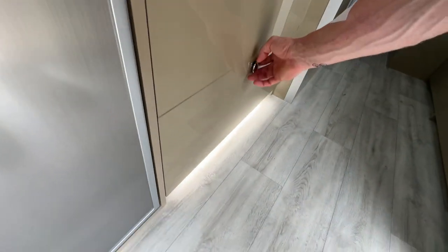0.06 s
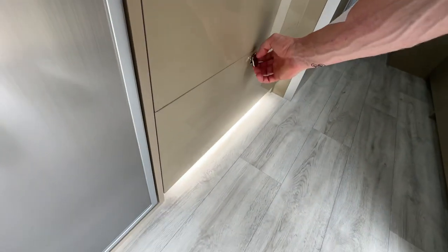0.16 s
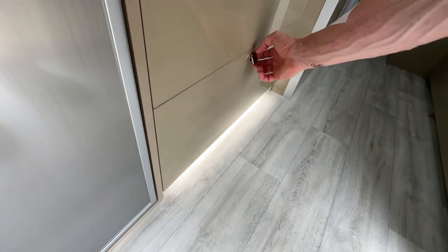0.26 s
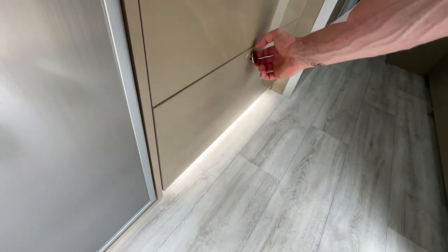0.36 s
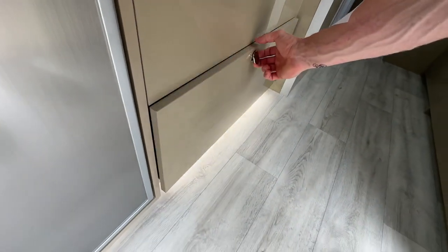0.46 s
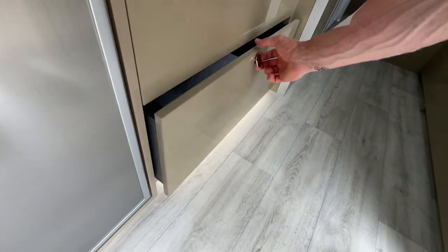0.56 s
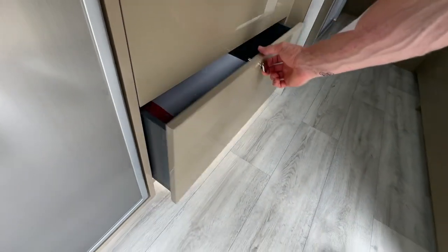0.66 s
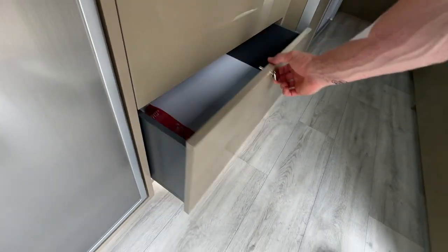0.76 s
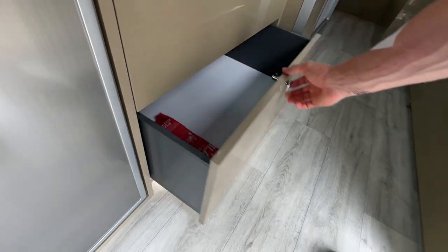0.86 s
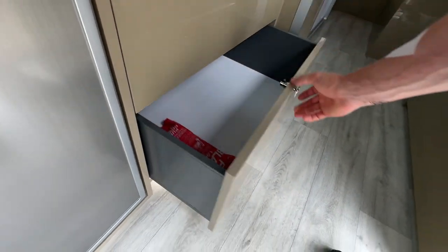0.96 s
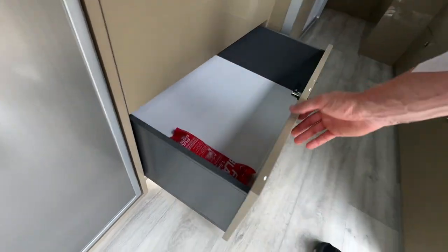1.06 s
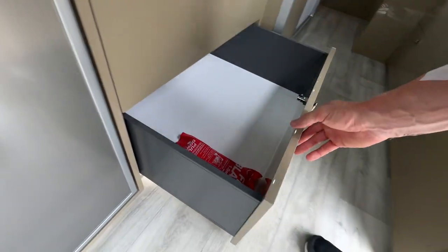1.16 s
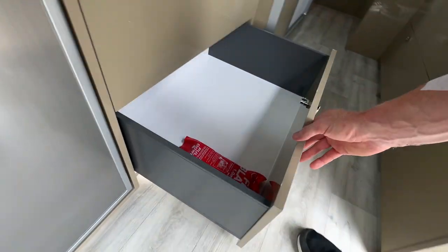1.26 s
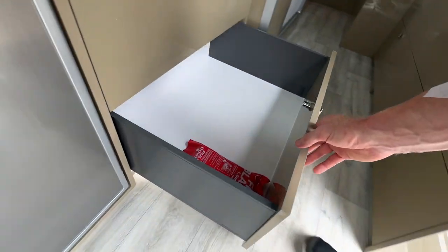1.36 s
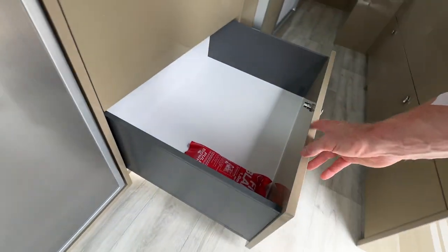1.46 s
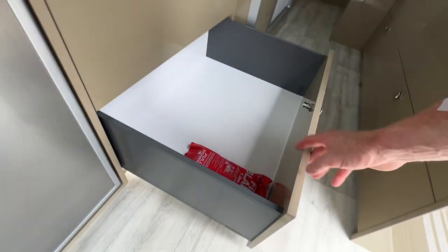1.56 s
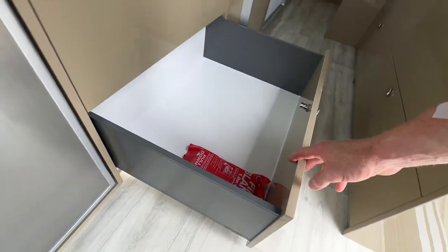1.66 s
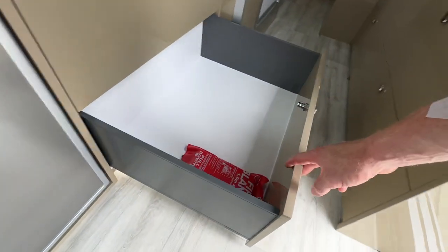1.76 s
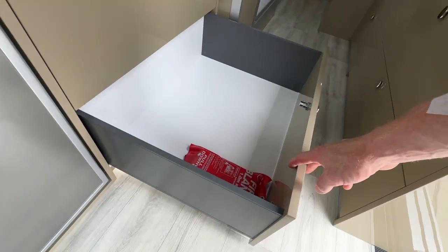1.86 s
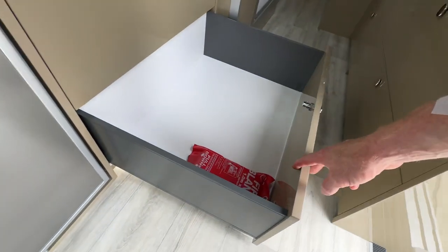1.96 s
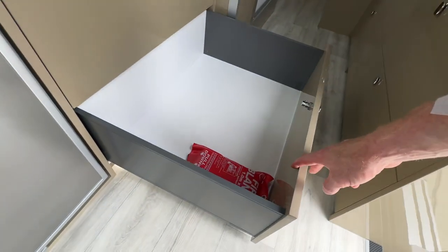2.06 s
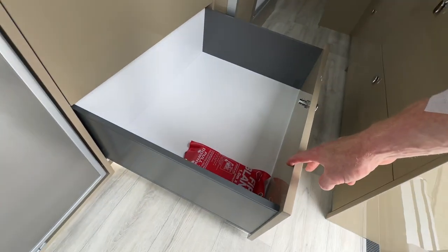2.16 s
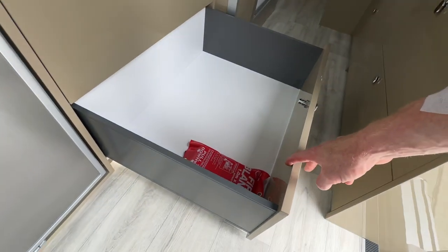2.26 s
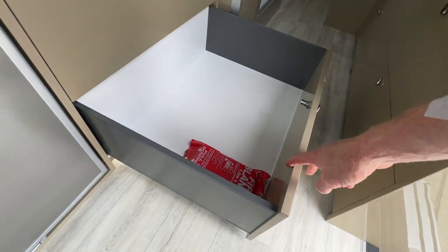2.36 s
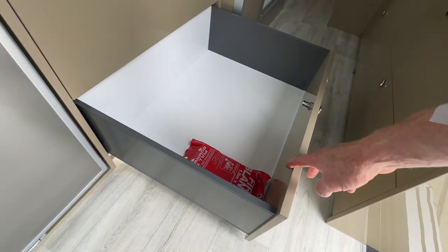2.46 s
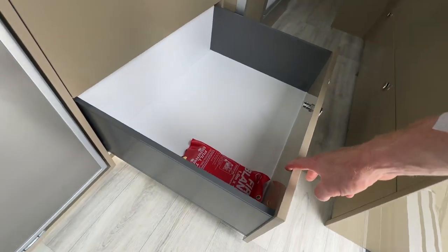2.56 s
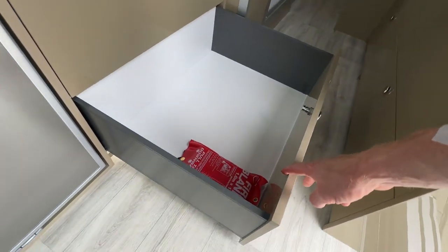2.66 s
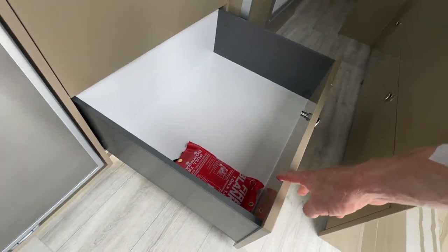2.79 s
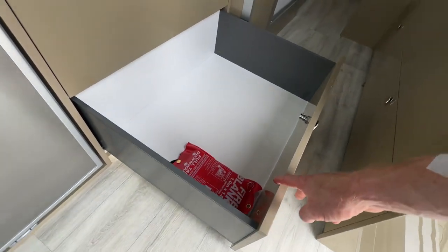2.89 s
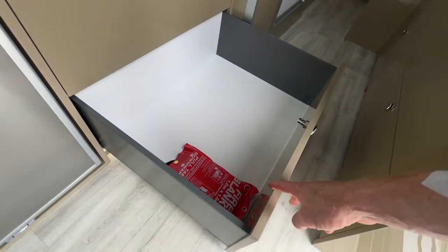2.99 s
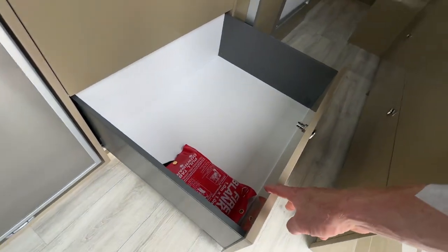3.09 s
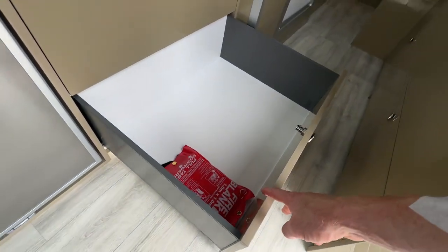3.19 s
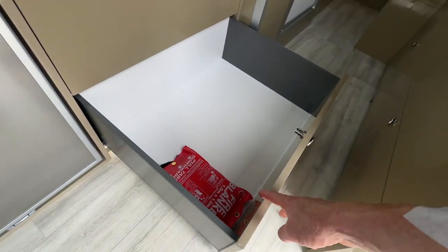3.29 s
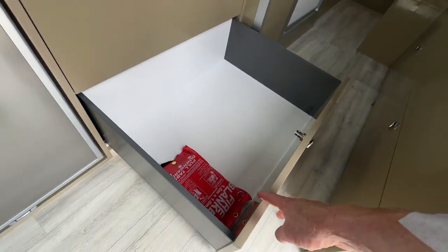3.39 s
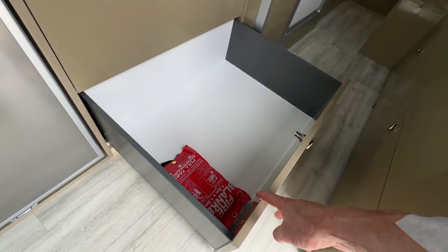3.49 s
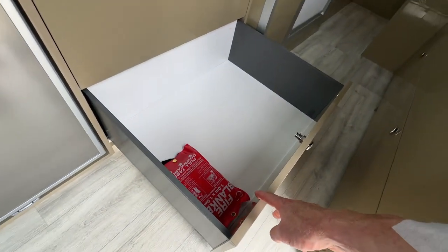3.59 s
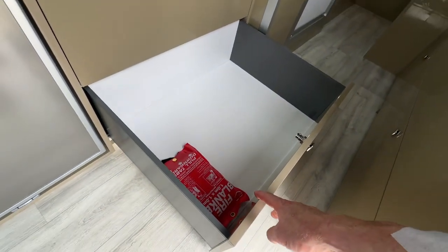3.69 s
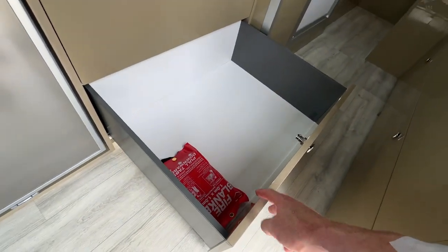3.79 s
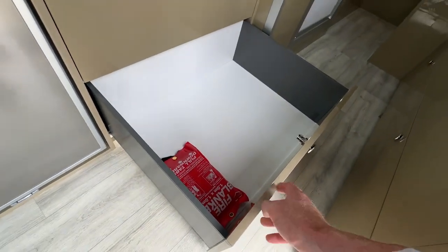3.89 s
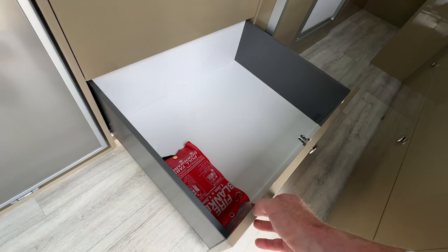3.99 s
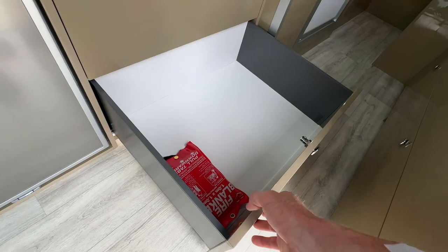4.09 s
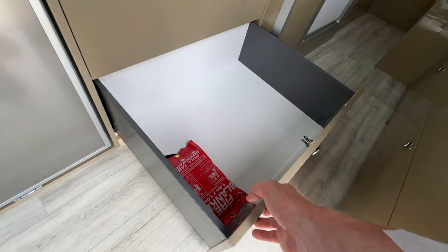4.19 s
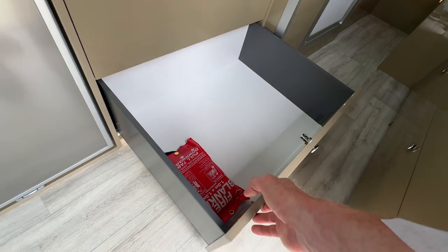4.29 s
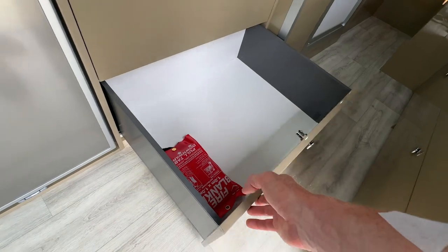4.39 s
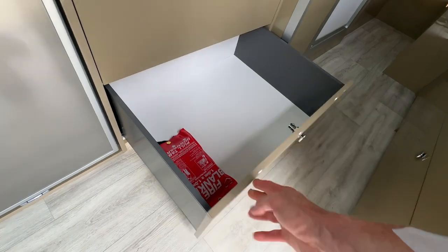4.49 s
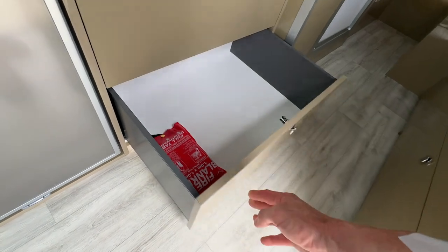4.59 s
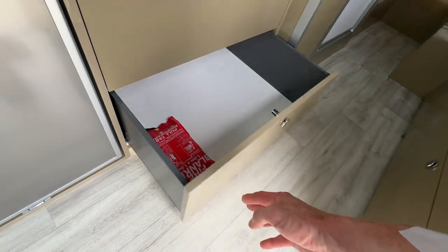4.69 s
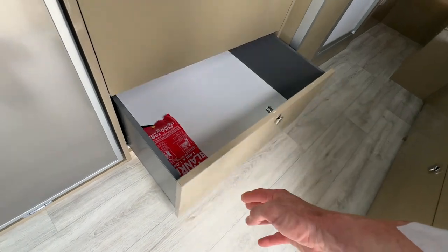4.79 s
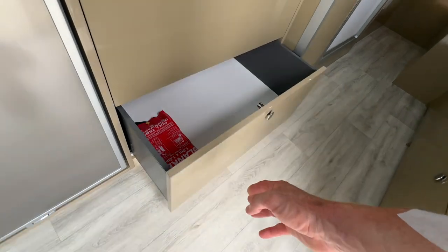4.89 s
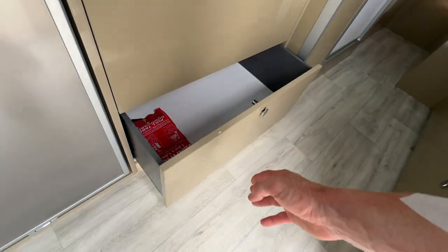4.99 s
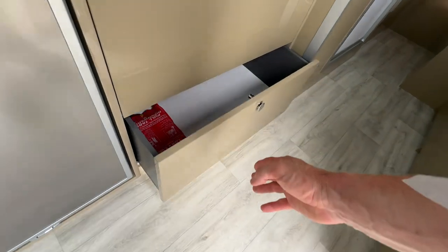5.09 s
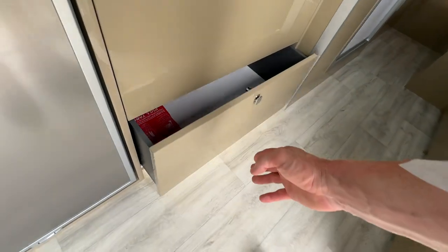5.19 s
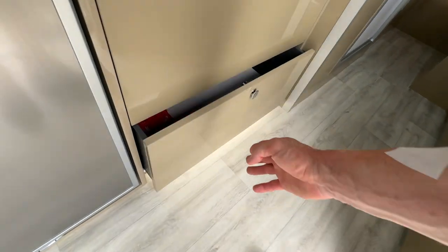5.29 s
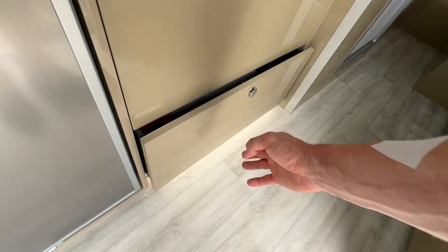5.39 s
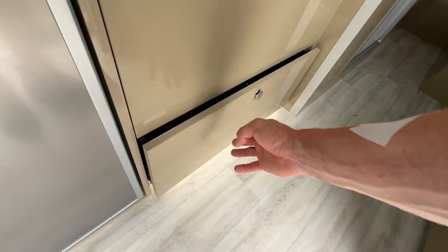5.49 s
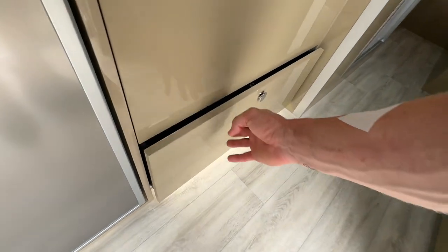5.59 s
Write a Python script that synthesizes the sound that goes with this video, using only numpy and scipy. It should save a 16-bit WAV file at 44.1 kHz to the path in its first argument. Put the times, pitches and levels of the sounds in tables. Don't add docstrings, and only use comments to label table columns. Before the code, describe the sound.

Inside a small van, close to a stereo microphone, a push latch clicks and its knob pops out. A wooden drawer rumbles out on steel runners and a very loud snap rings its front. Shoes scuff on vinyl and foil crinkles faintly. After a quiet pause the drawer rolls back, contents shifting, and a damper catches it with dull chatter. A low compressor hum continues throughout.

```python
import sys
import numpy as np
from scipy import signal
from scipy.fft import rfft, irfft, next_fast_len
from scipy.io import wavfile
from scipy.ndimage import map_coordinates

SR = 44100
rng = np.random.default_rng(int(sys.argv[2]) if len(sys.argv) > 2 else 0)


def bounce(signal):
    frames = np.transpose(np.atleast_2d(signal))
    limited = np.clip(frames, -1, 1)
    pcm = np.round(limited * 32767).astype(np.int16)
    wavfile.write(sys.argv[1], SR, pcm)


def level_to_linear(level):
    exponent = np.asarray(level, float) / 20
    return 10 ** exponent


N = 249165


def unit(x):
    return x / np.sqrt(np.mean(x ** 2, axis=-1, keepdims=True) + 1e-20)


def along(points, hz):
    f, v = np.transpose(points)
    return np.interp(np.log(hz + 1), np.log(f + 1), v)


def curves(*spans):
    t = np.arange(N) / SR
    s, *cols = np.transpose([row for span in spans for row in span])
    inside = 0
    for span in spans:
        start, end = span[0][0], span[-1][0]
        inside = inside + np.interp(t, [start - .2, start, end, end + .2], [0, 1, 1, 0])
    pause_db = 40 * (1 - np.minimum(inside, 1))
    return [np.interp(t, s, c) - pause_db for c in cols]


def wobble(rate):
    knots = rng.standard_normal(int(N * rate / SR) + 4)
    return map_coordinates(knots, [np.arange(N) * rate / SR])


def filtered(x, response):
    m = next_fast_len(x.shape[-1] + 8192)
    return irfft(rfft(x, m) * response(np.fft.rfftfreq(m, 1 / SR)), m)[..., :x.shape[-1]]


def shaped(points):
    return lambda hz: level_to_linear(along(points, hz))


def resonances(peaks):
    def response(f):
        return sum((-1) ** k * level_to_linear(db) * 1j * f * w / (c * c - f * f + 1j * f * w)
                   for k, (c, w, db) in enumerate(peaks))
    return response


def rush(response, grain_db, rate):
    lumps = level_to_linear(grain_db * wobble(rate))
    return unit(filtered(lumps * rng.standard_normal((2, N)), response))


def ports(pair, side, lag, pan, linked):
    lag_hz, turn = np.transpose(lag)

    def share(hz):
        delay = 1j * np.clip(linked, 0, .9) * np.tanh(3 * np.sin(np.interp(hz, lag_hz, turn)))
        tied = delay + .3 * np.tanh(along(pan, hz) / 4)
        return level_to_linear(along(side, hz)) * np.array([tied, np.sqrt(1 - abs(tied) ** 2)])

    difference = filtered(pair, share).sum(0)
    return np.array([pair[0] + difference, pair[0] - difference])


# (time [s], peak [dB], t60 [s], ring [dB], snap [dB])
KNOB_OUT = [
    (.1462, -25, .03, -8, 10),
    (.1482, -9, .13, 0, -7),
    (.1538, -11.5, 0.12, -7, -11),
    (.165, -26.5, 0.21, 0, -10),
]
KNOB_HOME = [
    (.8575, -30, .02, -24, 2),
    (.8595, -1.5, 0.062, -2, 4.5),
    (.8645, -4.5, 0.04, -15, -13),
    (.874, -8.5, 0.14, 1.5, -23),
    (.884, -13, 0.16, 5.5, -28),
]
# (frequency [Hz], level [dB per Hz])
CRACK_SHUT = [(150, -30), (250, -5), (748, -10), (875, -14), (1330, -3.5), (1640, -16.5), (3060, -20),
              (7190, -25), (8550, -18), (16000, -48)]
CRACK_OPEN = [(150, -51), (250, -8.5), (802, -8), (971, -9), (1380, 0.5), (5440, -14.5), (5930, -11.5),
              (11300, -29), (14200, -39.5), (16000, -78)]
# (frequency [Hz], level [dB], t60 [s])
FRONT_SHUT = [(511, -0.5, 0.13), (746, -2, 0.14), (1390, -7, 0.092), (1750, -15, 0.21), (3220, -7.5, 0.14),
              (3500, -13, 0.14), (4320, -19, 0.11), (5000, -25, 0.15), (5760, -9, 0.061), (6130, -30, 0.21),
              (7100, -7, 0.052), (9216, -11, 0.099), (10890, -29, 0.098), (11140, -32, 0.14)]
FRONT_OPEN = [(285, -8, .2), (477, -14, .13), (684, -7, .14), (807, -8, .1), (1170, -5, .135),
              (1235, -9, .13), (1362, -2, .125), (1696, -4, .087), (1770, -9, .1), (1860, -12, .2),
              (2000, -8, .08), (2190, -9, .11), (2510, -9, .09), (2670, -6, .094), (3246, -6, .057),
              (4264, -14, .099), (4915, -17, .12), (5760, -14, .11), (6309, -20, .13), (7070, -20, .12),
              (8419, -19, .09), (9860, -20, .08), (11190, -18, .083)]
# (frequency [Hz], left-right [dB])
NEAR_SIDE = [(60, -27), (110, -29), (200, -16), (380, -4), (700, -2), (1290, -1), (2380, 2), (4400, 0),
             (8120, 1), (15000, -12.5)]
NEAR_LAG = [(0, -7), (780, -2.5), (1720, -1), (3270, -6.5), (3880, 12.5), (5860, 0), (6550, -29),
            (7410, -10.5), (8790, -10.5), (9470, -2.5), (10500, 8.5), (14400, -6), (14900, -12),
            (16000, -27)]
NEAR_PAN = [(60, 0), (110, -2), (200, -4), (380, 11.5), (700, 1), (1290, 11), (2380, 5), (4400, 16),
            (8120, -0.5), (15000, -10)]


def latch(blows, modes, crack):
    snap_t60_s, crack_rise_s, ring_rise_s = 0.0089, 0.00035, 0.00015
    mode_spread_db, detune = 3.4, 0.0061
    out, t = np.zeros((2, N + SR)), np.arange(SR // 3) / SR
    for s, db, t60, ring_db, snap_db in blows:
        noise = unit(filtered(rng.standard_normal((2, len(t))), shaped(crack)))
        dull = filtered(noise, lambda hz: 1 / (1 + 1j * hz / 3500))
        body = dull * level_to_linear(-60 * t / t60) + (noise - dull) * level_to_linear(-60 * t / (1.02 * t60))
        snap = level_to_linear(snap_db - 60 * t / snap_t60_s) * rng.standard_normal((2, len(t)))
        ring = 0
        for hz, d, life in modes:
            level = level_to_linear(d + rng.normal(0, mode_spread_db, (2, 1)) - 60 * t / life)
            pitch_hz = hz * rng.normal(1, detune, (2, 1))
            phase = [[0], [rng.uniform(0, 2 * np.pi)]]
            ring = ring + level * np.sin(2 * np.pi * pitch_hz * t + phase)
        hit = (1 - np.exp(-t / crack_rise_s)) * (body + snap)
        hit += level_to_linear(ring_db - 6.0) * (1 - np.exp(-t / ring_rise_s)) * ring
        out[:, round(s * SR):][:, :len(t)] += level_to_linear(db - 13.5) * hit
    return ports(out[:, :N], NEAR_SIDE, NEAR_LAG, NEAR_PAN, linked=.5)


# (time [s], rumble [dB])
PULL = [(0.0, -62), (0.09, -46.5), (0.26, -46.5), (0.36, -55.5), (0.81, -44), (1.0, -44.5), (1.33, -48.5),
        (1.73, -61), (2.6, -56)]
PUSH = [(3.7, -55), (4.16, -69), (4.42, -52), (4.5, -45.5), (4.77, -46), (5.18, -48), (5.36, -45),
        (5.44, -52), (5.65, -63)]
# (frequency [Hz], width [Hz], level [dB])
BOX = [(131, 22.5, 7.5), (215.5, 56, 4.5), (320, 63, -2), (480, 252, -8)]
RUNNERS = [(630, 88, 1), (1050, 580, 3), (1470, 410, 4), (2260, 910, -3), (3080, 250, -5.5)]
# (time [s], hold [s], rub [dB], fizz over rub [dB])
SCUFFS = [
    (0.44, 0.18, -70, -30),
    (0.963, 0.31, -60, -7),
    (1.32, 0.035, -60, -4),
    (1.458, 0.072, -55.5, 0),
    (1.753, 0.061, -63, -15),
    (1.907, 0.022, -68, -6),
    (1.974, 0.035, -70, -16),
    (4.34, 0.015, -92, 6),
    (4.98, 0.031, -89, 21),
]
# (frequency [Hz], level [dB per Hz])
RUB = [(880, -31.5), (1500, -0.5), (2200, -7), (2420, -4), (3870, 0), (6760, -3.5), (8330, -7),
       (12000, -17.5), (15600, -63), (22000, -120)]
FIZZ = [(4120, -32), (7000, -18), (7610, -5.5), (11500, -1.5), (14800, -7), (16000, -19)]
# (frequency [Hz], left-right [dB])
AIR_SIDE = [(60, -11), (110, -8.5), (200, -6.5), (380, 0), (700, 2), (1290, 2), (2380, 0), (4400, 0),
            (8120, 1), (15000, -7.5)]
AIR_LAG = [(0, 0.5), (600, -3.5), (1120, -3), (2410, -4.5), (3100, 0.5), (4650, -6), (6120, -9.5),
           (7060, -14), (8010, 0.5), (9820, -21), (11100, 2.5), (13700, -13.5), (15700, -23), (16000, -3)]
AIR_PAN = [(60, -15), (110, 14.5), (200, 7), (380, 2), (700, 6), (1290, 25), (2380, 12.5), (4400, 70),
           (8120, 19), (15000, -42)]


def movement():
    runners_db, runners_share, load_db_per_s = -64.5, 0.62, 9.5
    rise_s, fall_db_per_s = 0.02, 251
    squeeze_s, squeeze_db, squeeze_db_per_s, squeeze_fizz_db = 4.417, -72.5, 19.5, -38
    t = np.arange(N) / SR
    box_db, = curves(PULL, PUSH)
    load_db = load_db_per_s * np.clip(t - squeeze_s, 0, 9)
    rollers_db = runners_db + runners_share * (box_db + 48.5) + load_db

    squeeze = np.clip((t - squeeze_s) / 0.18 + 1, 0, 1)
    squeeze *= level_to_linear(squeeze_db + squeeze_db_per_s * (t - squeeze_s))
    rubbing, fizzing = squeeze, squeeze * level_to_linear(squeeze_fizz_db)
    for s, hold, db, over_db in SCUFFS:
        stroke = np.clip((t - s) / rise_s + 1, 0, 1) * level_to_linear(-fall_db_per_s * np.clip(t - s - hold, 0, 9))
        rubbing = rubbing + level_to_linear(db) * stroke
        fizzing = fizzing + level_to_linear(db + over_db) * stroke

    roll = level_to_linear(box_db + 1.1) * rush(resonances(BOX), grain_db=3, rate=45)
    roll += level_to_linear(rollers_db) * rush(resonances(RUNNERS), grain_db=2.5, rate=70)
    rub = rubbing * level_to_linear(-0.2) * rush(shaped(RUB), grain_db=0.4, rate=50)
    rub += fizzing * rush(shaped(FIZZ), grain_db=2.5, rate=110)
    return ports(roll + rub, AIR_SIDE, AIR_LAG, AIR_PAN, linked=0.42)


# (frequency [Hz], width [Hz], level [dB], t60 [s])
CATCH = [(985, 1900, -4.5, 0.073), (1880, 370, -2, .05), (2540, 970, -2, 0.063), (4690, 320, -9, .07),
         (6070, 930, -19, 0.047), (11000, 6000, -22, 0.015)]
PAWL = [(1880, 520, 0, .08), (3900, 2500, -14, .2)]
SPRING = [(2350, 1920, 1.5, 0.017), (9220, 1600, 0, 0.013), (14300, 3000, -8, 0.0083)]
FLOOR = [(990, 940, 2, 0.088), (2230, 1600, -2, 0.14), (4140, 5800, 2, 0.084), (10000, 24000, -20.5, 0.082)]
DETENT = [(1560, 2000, 2, 0.0092), (3460, 1200, -2, 0.0078), (2180, 2600, -10.5, 0.14)]
DAMPER = [(740, 420, -1, .09), (1080, 450, -1, .08), (2000, 1100, -17, .06), (3800, 5000, -17, .12),
          (9000, 9000, -25, .08)]
CARCASS = [(70, 30, -2, 0.94), (217.6, 61, 2, 0.33), (253.6, 60, -4, 0.52), (310, 82, 3, .17),
           (470, 180, -2, 0.12), (685, 71, -4, 0.13)]
# (time [s], peak [dB], tilt [dB per octave], share of t60 [1], left-right [dB])
ON_CATCH = [
    (.0968, -29, 0, .6, -8),
    (.1008, -18, 0, .45, -8),
    (.104, -25, 0, .9, -6),
    (.112, -32, 0, 2.5, -5),
    (.1335, -35, -2, 1, -5),
    (.27, -48, 6, 1.2, 3),
]
ON_PAWL = [
    (.8297, -27.5, 0, 1, 4),
    (.838, -31, 0, .9, 4),
    (.852, -40, 3, .5, 4),
]
ON_SPRING = [
    (.1478, -19, 1.5, 1, -3),
    (.1495, -15.5, 1.5, 1.3, -3),
    (.8585, -24, 0, .5, -4),
    (.8602, -8, -3.5, .7, -4),
    (.8612, -18, -8, 2.2, -5),
]
ON_FLOOR = [
    (1.501, -42, -7, 1.3, .5),
    (1.725, -40, 5, 1.24, 6.1),
]
ON_DETENT = [
    (4.7911, -28, 0, 0.9, 2.3),
]
ON_DAMPER = [
    (5.316, -24, -1, .8, 6),
    (5.322, -28, 0, 1, 0),
    (5.329, -26, 1.5, 1, 3),
    (5.336, -28, 1.5, 1, 5),
    (5.343, -26, 0, 1, 2),
    (5.355, -33, 0, 1, 2),
]
ON_CARCASS = [
    (5.345, -26, 0, .8, 1.5),
    (5.386, -41, -4, .6, 1.6),
]
# (time [s], peak [dB], frequency [Hz], t60 [s])
BUMPS = [(0.1484, -11, 1200, 0.025), (.153, -16.5, 480, 0.095), (.616, -31.5, 960, 0.11),
         (.62, -38, 537, 0.15), (.633, -42, 1120, 0.089), (.642, -34, 623, .1), (0.861, -21, 790, 0.07),
         (1.09, -27, 252, 0.1), (1.17, -44.5, 1890, 0.56), (1.995, -42, 706, .25), (3.83, -41, 450, 0.095),
         (4.17, -34, 403, 0.1), (4.17, -49, 950, 0.046), (4.342, -38.5, 480, 0.11),
         (4.338, -43, 1050, 0.078), (4.48, -37.5, 320, 0.66), (4.52, -39, 520, 0.18),
         (4.56, -41, 920, 0.086), (4.57, -34, 145, 0.54), (4.806, -33, 380, 0.12), (4.875, -34, 390, 0.11),
         (4.92, -34, 324, 0.26), (4.965, -36, 376, 0.31), (5.232, -40.5, 690, 0.081)]
# (time [s], peak [dB], frequency [Hz])
CRINKLES = [
    (.786, -51, 11950),
    (1.838, -49.5, 9400),
    (1.908, -45, 9500),
    (1.908, -53, 14200),
    (2.058, -62, 13200),
    (4.999, -52, 10800),
]
# (time [s], peak [dB], frequency [Hz])
FINGER = [
    (.469, -43, 2400),
    (.494, -48, 2780),
    (.495, -38.5, 1470),
    (.494, -52, 3970),
    (.636, -54, 2700),
    (.658, -57, 2680),
    (1.503, -36, 734),
    (5.229, -46, 2300),
    (5.232, -41, 1250),
    (5.284, -42, 1450),
]
# (frequency [Hz], width [Hz])
RAIL = (1900, 25)
# (time [s], peak [dB], t60 [s], left-right [dB])
PINGS = [
    (.633, -47.5, .43, 1),
    (.918, -34, .15, 1),
]


def contacts():
    struck = [(CATCH, ON_CATCH), (PAWL, ON_PAWL), (SPRING, ON_SPRING), (FLOOR, ON_FLOOR),
              (DETENT, ON_DETENT), (DAMPER, ON_DAMPER), (CARCASS, ON_CARCASS)]
    rows = []
    for body, blows in struck:
        for s, db, tilt, share, pan in blows:
            for hz, width, d, t60 in body:
                rows.append((s, db + d + tilt * np.log2(hz / 2000), hz, width, share * t60, pan))
    rows += [(s, db, hz, max(0.59 * hz, 135), t60, 2) for s, db, hz, t60 in BUMPS]
    rows += [(s, db, hz, 0.23 * hz, 0.057, 0) for s, db, hz in CRINKLES + FINGER]
    rows += [(s, db, *RAIL, t60, pan) for s, db, t60, pan in PINGS]
    return sorted(rows)


def ticks():
    out, t = np.zeros((2, N + SR)), np.arange(SR // 4) / SR
    pan_db = np.zeros(N + SR)
    for s, db, hz, width, t60, pan in contacts():
        band = resonances([(hz, width, 0)])
        sources = np.vstack([t == 0, rng.standard_normal((2, len(t)))])
        click, *noise = filtered(sources, lambda f: band(f) ** 3)
        if width < 130:
            grain = np.sqrt(2) * np.sin(2 * np.pi * hz * t + np.array([[0], [2]]))
        else:
            grain = unit(np.array(noise))
        puff = level_to_linear(-60 * t / t60) * (1 - np.exp(-t / 0.00087)) * grain
        impulse = min(0.022 / t60, 4) * np.outer([1, 0], click) / abs(click).max()
        out[:, round(s * SR):][:, :len(t)] += level_to_linear(db - 8.0) * (puff + impulse)
        pan_db[round(s * SR):] = pan / 2
    pair = ports(out[:, :N], NEAR_SIDE, NEAR_LAG, [(100, 0)], linked=.5)
    return pair * level_to_linear([pan_db[:N], -pan_db[:N]])


# (time [s], frequency [Hz])
COMPRESSOR = [(0.0, 100.5), (0.19, 99.1), (0.961, 98.9), (1.57, 100.3), (2.781, 100.3), (2.9, 98.6),
              (5.65, 98.8)]
# (multiple of shaft [1], level under the third [dB])
SHAFT = [(1, -21), (2, -14), (4, -28), (5, -19)]
# (frequency [Hz], level [dB], unsteadiness [dB])
FAN = [(59.2, -44, 1), (382, -72, 2), (1227, -69.5, 4), (1287, -73, 4), (2218, -83, 2)]
# (time [s], level [dB])
WHINE = [(0, 3), (1.25, 2), (1.5, -6), (1.9, 0), (2.3, 1), (3.1, 1), (3.3, -9), (5.65, -9)]


def machines():
    compressor_db = -35.5
    s, hz = np.transpose(COMPRESSOR)
    t = np.arange(N) / SR
    whine_db, = curves(WHINE)
    turn = 2 * np.pi * np.cumsum(np.interp(t, s, hz)) / (3 * SR)
    hum = np.sin(3 * turn) * level_to_linear(.7 * wobble(6))
    for k, db in SHAFT:
        hum = hum + level_to_linear(db + 0.57 * wobble(45)) * np.sin(k * turn + rng.uniform(0, 5.06))
    fan = 0
    for f, db, shake in FAN:
        level = level_to_linear(db + shake * wobble(9) + whine_db * (f > 1000))
        fan = fan + level * np.sin(2 * np.pi * f * t + .4 * shake * wobble(3 * shake))
    return np.sqrt(2) * (level_to_linear(compressor_db) * hum + fan) * level_to_linear([[.7], [-.7]])


# (frequency [Hz], level [dB per Hz])
DRONE = [(13, -55), (22, -29.5), (81, -3), (103, -3), (125, -15.5), (151, -6), (179, -11), (300, -26),
         (390, -72.5), (660, -120)]
AIR = [(100, -14), (180, -15.5), (360, -19), (650, -25), (1300, -27.5), (1700, -34), (3000, -38.5),
       (3600, -43), (5800, -46), (7200, -53.5), (7700, -37), (10000, -54), (16000, -78)]
HISS = [(4410, -40), (7500, -5), (7900, 0), (8400, 0), (9030, -12), (9540, -24), (10800, -39), (13800, -30),
        (15000, -35)]


def cabin():
    drone_db, air_db, hiss_db = -46, -52, -68
    drone = level_to_linear(drone_db + 0.85 * wobble(4.1)) * rush(shaped(DRONE), grain_db=0.5, rate=17)
    air = level_to_linear(air_db) * rush(shaped(AIR), grain_db=.9, rate=21)
    air += level_to_linear(hiss_db) * rush(shaped(HISS), grain_db=.5, rate=24)
    return ports(drone + air, AIR_SIDE, AIR_LAG, AIR_PAN, linked=.6)


def scene():
    knob = latch(KNOB_OUT, FRONT_SHUT, CRACK_SHUT) + latch(KNOB_HOME, FRONT_OPEN, CRACK_OPEN)
    return knob + movement() + ticks() + machines() + cabin()


def top_cut(x):
    return signal.sosfilt(signal.butter(12, 16460, fs=SR, output="sos"), x)


# (frequency [Hz], width [Hz], depth [dB])
GAPS = [(5290, 57, 35), (7500, 110, 16), (9470, 40, 12.5), (9800, 12, 12)]


def record(dry):
    top_hz, ceiling = 16300, .97

    def treble_shape(hz):
        gap_db = sum(db * np.exp(-((hz - c) / w) ** 4) for c, w, db in GAPS)
        slope_db = 25 * np.clip((hz - 15300) / 1000, 0, 1)
        return level_to_linear(-gap_db - slope_db) * (hz < top_hz)

    x = filtered(dry, treble_shape)
    mix = x / (1 + abs(x / ceiling) ** 8) ** (1 / 8)
    return top_cut(mix)


dry = scene()
out = record(dry)
bounce(out)
```